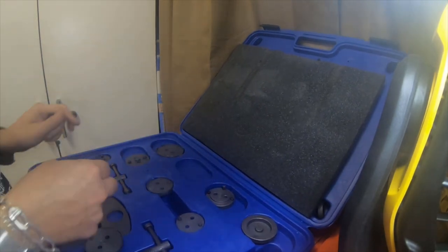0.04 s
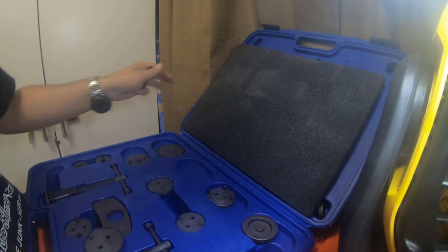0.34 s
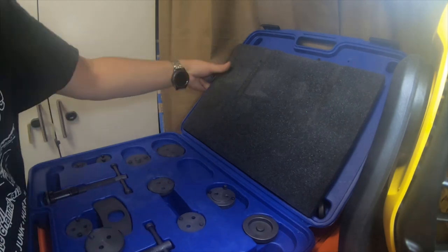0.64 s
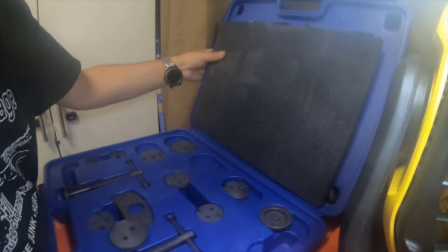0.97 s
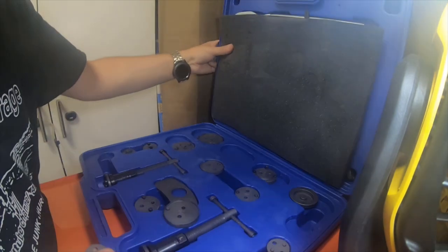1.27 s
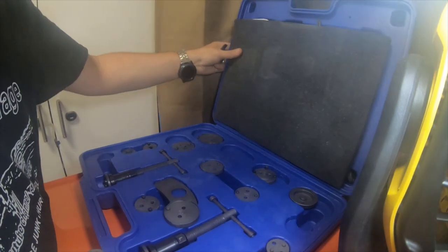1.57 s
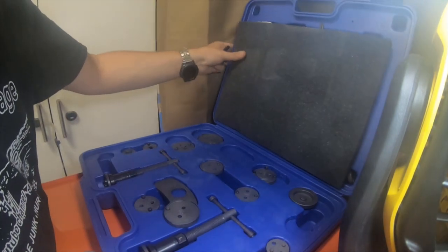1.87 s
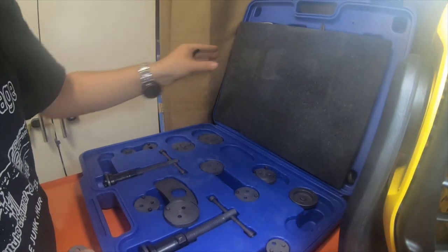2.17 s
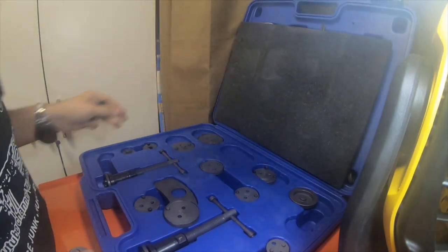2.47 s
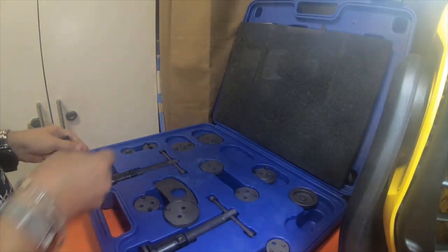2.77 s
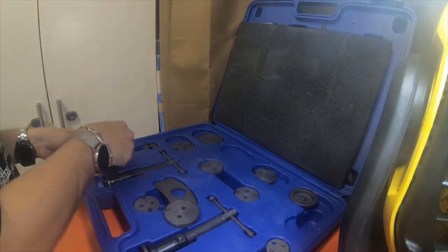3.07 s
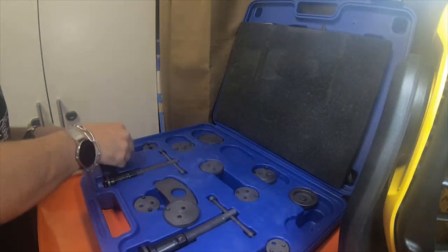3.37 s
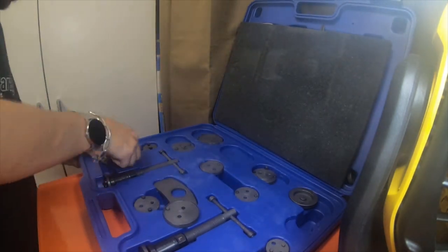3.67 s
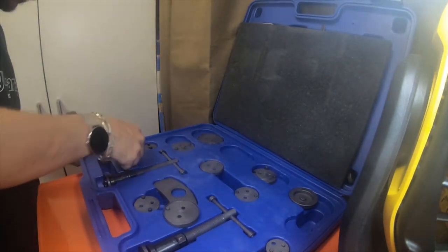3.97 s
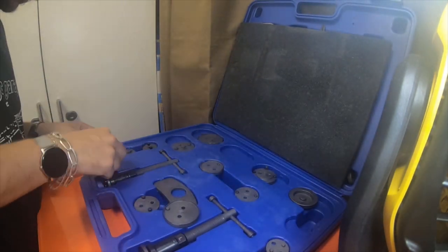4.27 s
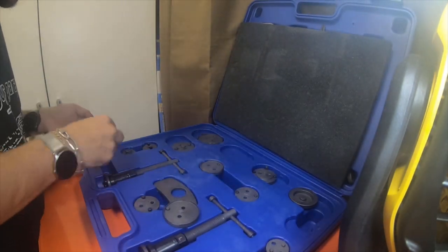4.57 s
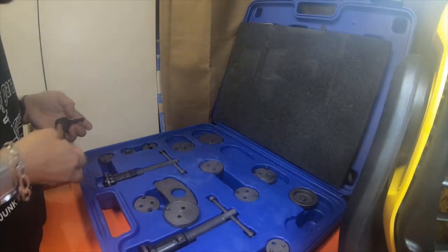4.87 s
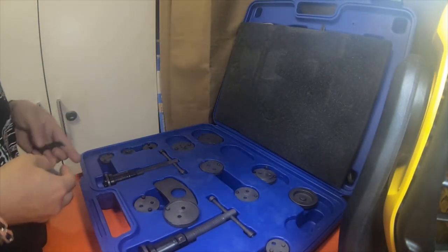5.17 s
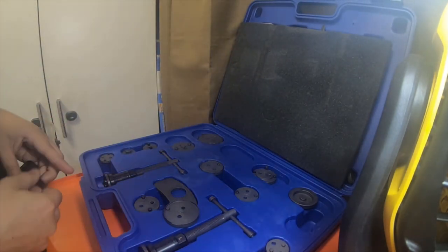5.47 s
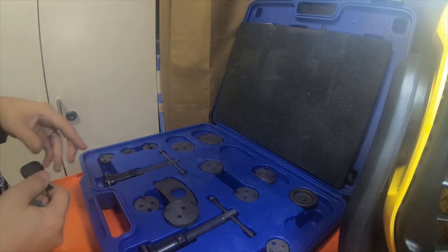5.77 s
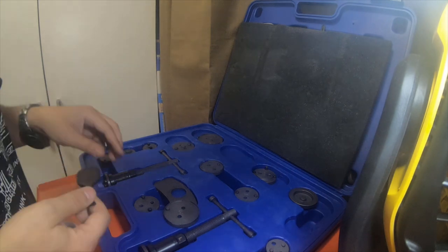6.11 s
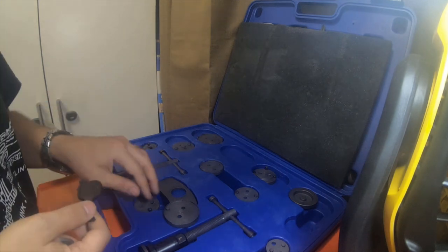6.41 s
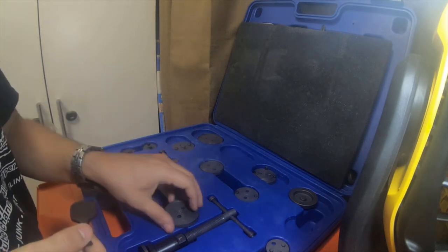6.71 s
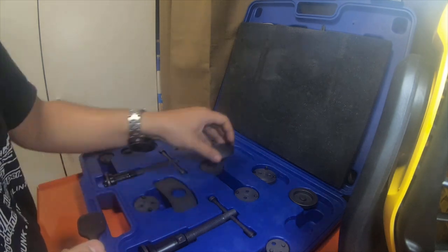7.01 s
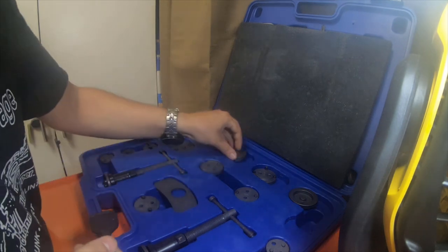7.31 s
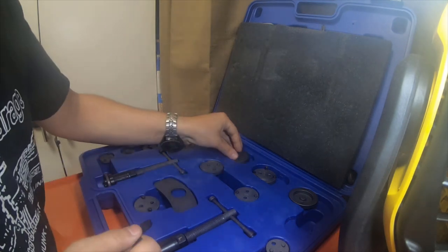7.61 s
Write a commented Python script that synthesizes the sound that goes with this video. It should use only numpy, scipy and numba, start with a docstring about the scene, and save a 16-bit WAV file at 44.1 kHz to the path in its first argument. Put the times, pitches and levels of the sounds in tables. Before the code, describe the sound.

A hollow plastic case clunks and groans as its lid is forced back, its foam sheet rubbing. Light metal clicks follow, then knocks with a slight rattle as a steel piece comes out of the tray. A quieter stretch of swishing sleeves and ticks ends with a steel disc thudding into its pocket. The close microphone rumbles faintly when jolted, and the small room's hiss dips after the hardest blows.

```python
"""Hollow knocks and a groan from a blow-moulded plastic tool case, close to a phone in a small room.
The lid is knocked and pushed back while its foam sheet rubs; a steel piece is prised out of the tray and
a steel disc is pressed into its pocket. Blows ring the shell and set loose parts buzzing; tight contacts
stick and slip. Sleeves swish, small steel parts tick and jolts rock the phone, whose gain control ducks
the room hiss after the hardest knocks."""
import sys
import numpy as np
from scipy import signal
from scipy.fft import rfft, irfft, next_fast_len
from scipy.io import wavfile
from numba import njit

SR = 44100
rng = np.random.default_rng(int(sys.argv[2]) if len(sys.argv) > 2 else 0)


def store_wav(level_fs):
    """Save 16-bit WAV to argv[1]."""
    pcm = np.round(np.clip(np.atleast_2d(level_fs), -1, 1) * 32767)
    wavfile.write(sys.argv[1], SR, pcm.T.astype(np.int16))


N = 346185
TIME = np.arange(N) / SR
AGE = TIME[:SR // 2]  # seconds since a blow


def undb(db):
    """Decibels to gain."""
    return 10 ** (np.asarray(db) / 20)


def unit(x):
    """Scale to rms 1."""
    return x / np.sqrt(np.mean(x ** 2))


def strike(x, size=441):
    """Scale a blow to rms 1 over its first hundredth of a second."""
    return x / np.sqrt(np.mean(x[:size] ** 2))


def fade(t60):
    """Exponential decay, 60 dB down after t60 seconds."""
    return np.exp(-np.log(1000) * AGE / max(t60, 1 / SR))


def cut(x, hz, kind, order=2):
    """Causal low-pass or high-pass."""
    return signal.sosfilt(signal.butter(order, min(hz, SR / 2 - 1), kind, fs=SR, output="sos"), x)


def noise(points, size):
    """Noise of rms 1, coloured by (freq_hz, density_db) points."""
    hz, db = np.transpose(points)
    n = next_fast_len(size)
    gain = undb(np.interp(np.log(np.fft.rfftfreq(n, 1 / SR) + 1), np.log(hz), db))
    return unit(irfft(rfft(rng.standard_normal(n)) * gain, n)[:size])


def die_away(x, t60, slope):
    """Each octave fades at its own rate: t60 holds at 1 kHz, and higher octaves go sooner."""
    octave = np.log2(np.clip(np.fft.rfftfreq(len(x), 1 / SR), 125, 16000) / 1000)
    spectrum = rfft(x)
    bands = {k: irfft(spectrum * np.maximum(1 - abs(octave - k), 0), len(x)) for k in range(-3, 5)}
    return sum(band * fade(t60 * 2 ** (-slope * k)) for k, band in bands.items())


def ring(modes, ring_scale, scatter_db, pitch=1):
    """Decaying modes, driven with other strengths and signs at each contact; ring_scale scales t60."""
    drive = undb(scatter_db * rng.standard_normal(len(modes))) * rng.choice([-1, 1], len(modes))
    return strike(sum(gain * undb(db) * np.sin(2 * np.pi * hz * pitch * AGE) * fade(t60 * ring_scale)
                      for gain, (hz, db, t60) in zip(drive, modes)))


def walk(rate_hz):
    """Smooth random wander with a spread near 1."""
    knots = rng.standard_normal(4096)
    return np.interp(TIME * rate_hz, np.arange(len(knots)), knots)


def add(track, start_s, sound):
    """Mix a sound in at start_s."""
    i = int(start_s * SR)
    track[i:i + len(sound)] += sound[:N - i]


def stroke(start, length, onset_share=.13, release_share=.13):
    """Speed of one hand stroke: it builds, holds and dies out, the slopes set as shares of its length."""
    attack = np.clip((TIME - start) / (onset_share * length), 0, 1)
    return attack * np.exp(-np.maximum(TIME - start - length, 0) / (release_share * length))


def slips(per_s, uneven_db):
    """Stick and slip: small pushes of uneven size at uneven moments."""
    return (rng.random(N) < per_s / SR) * undb(uneven_db * np.clip(rng.standard_normal(N), -2, 2))


def background(hiss_db=-46.5, hum_hz=128, hum_db=-55.5, air_db=-44):
    """Steady hiss, a faint wavering hum, and slow air at the microphone."""
    # room tone and air rumble: freq_hz, density_db
    hiss_colour = [(24, -45), (40, -5), (64, -2), (87, -7.5), (129, -4.5), (301, -12.5), (548, -14.5),
                   (817, -17), (903, -18.5), (1130, -21.5), (1250, -19), (1350, -20.5), (15500, -30)]
    air_colour = [(5, 2), (15, 1), (40, -4), (60, -22), (120, -15.5), (400, -90.5)]
    hiss = undb(hiss_db) * noise(hiss_colour, N)
    hum = undb(hum_db + 1.4 * walk(1.9)) * np.sin(2 * np.pi * hum_hz * TIME + 1.2 * walk(19))
    return hiss + hum + undb(air_db) * noise(air_colour, N)


def room(x, wet_db=-15, first_wall_s=0.012):
    """A small furnished room: a dense, short tail."""
    build_up = 1 - np.exp(-(AGE / first_wall_s) ** 2)
    tail = die_away(rng.standard_normal(len(AGE)), t60=0.27, slope=0.072) * build_up
    return x + undb(wet_db) * signal.fftconvolve(x, tail / np.linalg.norm(tail))[:N]


def sway():
    """Sub rumble: the phone rocks on its support; a slow push stirs only the slowest modes."""
    # jolts to the support: start_s, drive_db, push_s
    jolts = [(.78, -26, 0.025), (1.078, -26.5, 0.012), (1.266, -9.5, 0.0085), (3.121, -25, 0.028),
             (3.7, -16.5, 0.098), (7.32, -23, 0.0064)]
    # rocking modes: freq_hz, gain_db, t60_s
    rocking_modes = [(5.329, 4, 3.87), (9.4, -3, 2), (16.59, -1, 3.17), (20.6, 12.5, 0.62), (29.5, -10, .9),
                     (39.9, 9.5, 0.38)]
    out = np.zeros(N)
    for start, jolt_db, push_s in jolts:
        for hz, db, t60 in rocking_modes:
            swing = undb(jolt_db + db - 60 * TIME / t60) / (1 + (hz * push_s) ** 2)
            add(out, start, swing * (1 - np.exp(-TIME / push_s)) * np.sin(2 * np.pi * hz * TIME))
    return out


def slides(grain_db=1.5, jerk_db=2.37, rustle_db=-58.5, rustle_hz=2200, restless_db=3):
    """Swishes: fibres catch and let go by the thousand, in each stroke and faintly in between."""
    # foam, sleeves and fingers sliding: start_s, length_s, level_db, brightness_hz
    swishes = [(0.503, 0.19, -40.5, 5000), (0.675, 0.7, -31.5, 5560), (1.427, 0.19, -32, 6500),
               (1.606, 0.35, -37.5, 2000), (2.003, .36, -50, 1780), (2.677, 0.14, -50.5, 4200),
               (2.916, 0.09, -38.5, 4530), (2.89, .54, -47, 2610), (3.812, 0.53, -55, 2600),
               (5.81, 0.085, -43.5, 2760), (6.681, 0.053, -41, 4500), (6.764, 0.055, -44, 2800),
               (7.185, 0.082, -43, 2900), (7.698, 0.12, -39, 3230)]
    # fibre friction: freq_hz, density_db
    rub_colour = [(80, -7), (250, 13.5), (700, 8), (1500, 9), (3000, 5.5), (6000, 3.5), (9500, 5),
                  (11500, 0), (16000, 2)]
    fibres = cut(noise(rub_colour, N), 260, "high", order=1)  # light rubbing radiates little bass
    fibres *= undb(grain_db * walk(450) + jerk_db * walk(35))
    # clothes are never quite at rest
    out = undb(rustle_db + restless_db * walk(6.4)) * unit(cut(fibres, rustle_hz, "low", order=1))
    for start, length, db, bright_hz in swishes:
        out += undb(db) * stroke(start, length) * unit(cut(fibres, bright_hz, "low", order=1))
    return out


def ticks():
    """Small steel parts touch: a sharp snap and a thin, high ring."""
    # steel on steel: start_s, level_db, ring_hz
    touches = [(.167, -50, 5540), (2.632, -30.5, 5730), (2.647, -35, 5630), (2.687, -36, 5400),
               (2.717, -41.5, 6040), (3.779, -48.5, 8000), (4.993, -38, 5630), (5.264, -36, 5640),
               (5.278, -45, 5560)]
    # modes of a small part: pitch_ratio, gain_db, base_t60_s
    steel_modes = [(1, 0, .075), (1.09, -5, .025), (1.27, -5, .02), (1.59, -7, .03), (1.74, -8, .025),
                   (2.14, -10, .02), (2.39, -10, .02)]
    out = np.zeros(N)
    for start, db, ring_hz in touches:
        treble = cut(rng.standard_normal(len(AGE)), 4200, "high")
        snap = strike(cut(treble, 8000, "low", order=1) * fade(.022))
        ping = ring(steel_modes, ring_scale=.75, scatter_db=1.5, pitch=ring_hz)
        add(out, start, undb(db) * strike(snap + undb(-1) * ping))
    return out


def squeaks(waver_rad=2.7):
    """A tight contact sings briefly, unsteady in pitch and strength."""
    # the lid stopping and the disc binding: start_s, length_s, pitch_hz, level_db
    chirps = [(1.281, 0.034, 9300, -23), (1.284, 0.035, 4080, -21), (7.325, .09, 9850, -46)]
    waver = waver_rad * walk(600)
    grip = undb(4 * walk(250))
    return grip * sum(undb(db) * stroke(start, length) * np.sin(2 * np.pi * hz * TIME + waver)
                      for start, length, hz, db in chirps)


def scrapes():
    """Steel rasps on plastic: quick slips keep the tray's resonances ringing."""
    # steel dragged over the tray: start_s, length_s, level_db
    strokes = [(2.318, 0.047, -42), (4.299, 0.069, -42.5), (6.744, 0.061, -42.5), (7.176, 0.011, -23.5),
               (7.725, .14, -36.5)]
    # tray resonances: freq_hz, gain_db, base_t60_s
    tray_modes = [(274, -0.5, 0.066), (514, 2, 0.034), (900, 4, 0.023), (914, 7, 0.034), (1170, -11, 0.1),
                  (1720, 11.5, 0.011), (2140, 1.5, 0.016), (2710, -8.5, 0.054), (4160, -4, 0.017)]
    friction = slips(per_s=520, uneven_db=3.0)
    rasp = signal.fftconvolve(friction, ring(tray_modes, ring_scale=0.92, scatter_db=2.0))[:N]
    return unit(rasp) * sum(undb(db) * stroke(start, length) for start, length, db in strokes)


def panel(x, hz, q):
    """The panel under the contact booms at its lowest resonance and radiates little below it."""
    w = np.tan(np.pi * hz / SR)
    return signal.lfilter(*signal.bilinear([1, 0, 0], [1, w / q, w * w], fs=.5), x)


def case(hard_hz, panel_hz, ring_scale, modes_db=-7.5):
    """The case answers one push: a soft contact leaves out the treble, a stiff spot the bass."""
    # the crowd of short-lived wall modes: freq_hz, density_db
    shell_colour = [(60, 16.5), (130, 4), (280, 2.5), (450, 1.5), (700, -1.5), (1100, 0), (2000, -3.5),
                    (3500, -5.5), (6000, -4), (10000, -39.5), (16000, -34.5)]
    # modes of the case with its steel tools inside: freq_hz, gain_db, base_t60_s
    case_modes = [(150, 1, 0.073), (211, -8, 0.29), (272, -11.5, 0.33), (288, 1, 0.14),
                  (378.7, -3.5, 0.069), (501, -17.5, 0.023), (554.7, -3, 0.1), (636, -12.5, 0.1),
                  (729, -12.5, 0.17), (843, -1, 0.065), (968, -5.5, 0.041), (1115, 1.5, 0.056),
                  (1207, -8, .07), (1300, -1, 0.036), (1713, -9.5, 0.032), (1880, -7, 0.063),
                  (2043, -7.5, 0.062), (2340, -2.5, 0.039), (2690, -2, 0.053), (3060, -17.5, 0.14),
                  (3390, -21, 0.14), (3700, -27.5, 0.26), (4660, -26.5, 0.031), (4540, -16.5, 0.069),
                  (4320, -12.5, .1)]
    walls = strike(die_away(noise(shell_colour, len(AGE)), t60=0.075 * ring_scale, slope=0.54))
    body = walls + undb(modes_db) * ring(case_modes, ring_scale, scatter_db=6.0)
    return strike(panel(cut(body, hard_hz, "low", order=3), panel_hz, q=1.0))


def drag(spot_count=5, bind_db_per_s=30.5, let_go_s=0.032):
    """Plastic groans at several spots: each slip is a dull push on the case, harder as the parts bind."""
    # jerky pushes at the hinge and round the disc: start_s, length_s, end_level_db
    pushes = [(.62, 0.31, -26), (1.004, 0.24, -15), (1.266, .085, -8.5), (1.793, 0.023, -40.5),
              (7.165, 0.14, -25.5)]
    spots = (case(hard_hz=543, panel_hz=189, ring_scale=0.74) for _ in range(spot_count))
    groan = sum(signal.oaconvolve(slips(per_s=40, uneven_db=3), spot)[:N] for spot in spots)
    force = np.zeros(N)
    for start, length, db in pushes:
        past_end = TIME - start - length
        binding = undb(db + bind_db_per_s * np.minimum(past_end, 0))
        force += (TIME > start) * binding * np.exp(-np.maximum(past_end, 0) / let_go_s)
    return unit(groan) * force


def knocks():
    """Each blow rings the part it lands on and sets loose parts buzzing for a moment."""
    # blows on the case: start_s, part, level_db, hardness_hz
    blows = [ (.521, "rim", -33.5, 490), (.579, "rim", -13, 690), (.604, "hinge", -3, 1900),
             (.610, "rim", -7, 1270), (.674, "rim", -20.5, 280), (0.817, "hinge", -20.5, 1890),
             (0.8473, "hinge", -7.5, 1800), (0.8687, "hinge", -5, 1700), (.994, "hinge", -21.5, 2530),
             (1.081, "lid", -12.5, 483), (1.167, "lid", -13, 1400), (1.187, "lid", -10.5, 1440),
             (1.2653, "lid", -2, 540), (1.272, "lid", 2.5, 1000), (1.293, "lid", 1.5, 1620),
             (1.328, "lid", -1, 1280), (1.362, "lid", -14.5, 3200), (1.576, "lid", -20, 522),
             (3.136, "tray", -3.5, 1840), (3.156, "tray", -4.5, 845), (3.285, "tray", -10.5, 930),
             (3.291, "tray", -12.5, 617), (3.3268, "tray", -15, 744), (3.4178, "slot", -4, 3700),
             (3.426, "slot", -2, 2840), (3.433, "rim", -14, 700), (3.623, "slot", -26.5, 2080),
             (3.668, "slot", -31, 1680), (3.89, "slot", -33, 930), (5.791, "pocket", -38, 1370),
             (6.684, "pocket", -30.5, 980), (6.796, "pocket", -32, 900), (7.164, "pocket", -17.5, 470),
             (7.180, "pocket", -20, 930), (7.254, "pocket", -25.5, 400), (7.295, "pocket", -3.5, 544),
             (7.321, "pocket", 3.5, 1020), (7.337, "pocket", 6.5, 684), (7.350, "pocket", 4.5, 400),
             (7.363, "pocket", -3, 800), (7.374, "pocket", 7.5, 550), (7.4056, "pocket", 2, 784)]
    # voice of each part: panel_hz, ring_scale, rattle_db (relative to the blow)
    parts = {"rim": (210, .85, -42.5), "hinge": (640, 0.74, -34), "lid": (258, 1.31, -18),
             "tray": (584, 0.59, -25.5), "slot": (720, 0.92, -16), "pocket": (254, 0.76, -18.5)}
    # buzz of loose parts: freq_hz, density_db
    rattle_colour = [(500, -21.5), (1800, 11.5), (4000, -1.5), (6500, -5.5), (8500, -12.5), (9400, -8.5),
                     (10500, -23.5), (16000, -27)]
    out = np.zeros(N)
    for start, part, db, hard_hz in blows:
        panel_hz, ring_scale, rattle_db = parts[part]
        buzz = strike(noise(rattle_colour, len(AGE)) * fade(0.086 * ring_scale))
        add(out, start, undb(db) * (case(hard_hz, panel_hz, ring_scale) + undb(rattle_db) * buzz))
    return out


def scene():
    """All the handling sounds in the room, over the rumble and the background."""
    handling = knocks() + drag() + scrapes() + squeaks() + ticks() + slides()
    return (room(handling) + sway() + background())[None]


@njit
def follow(x, attack, release):
    """Envelope follower with separate rates for rising and falling."""
    out, level = np.empty(len(x)), 0.
    for i in range(len(x)):
        level += (x[i] - level) * (attack if x[i] > level else release)
        out[i] = level
    return out


def record(dry, limit_db=-7, attack_s=0.0038, release_s=0.25, top_hz=16000):
    """Gain control, deaf to rumble, ducks after loud blows; stray peaks are rounded; the top is cut."""
    loudness = follow(abs(cut(dry[0], 110, "high")), 1 / (attack_s * SR), 1 / (release_s * SR))
    ducked = dry / np.maximum(1, loudness / undb(limit_db))
    rounded = .97 * ducked / (1 + ducked ** 6) ** (1 / 6)
    return signal.sosfilt(signal.ellip(10, .1, 80, top_hz, fs=SR, output="sos"), rounded)


dry = scene()
out = record(dry)
store_wav(out)
```